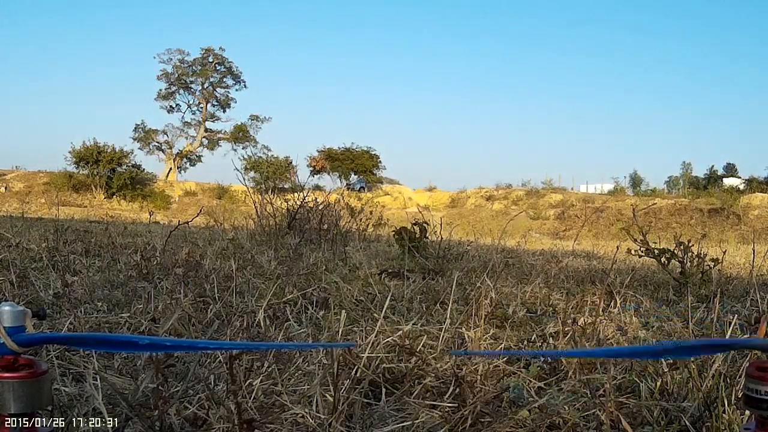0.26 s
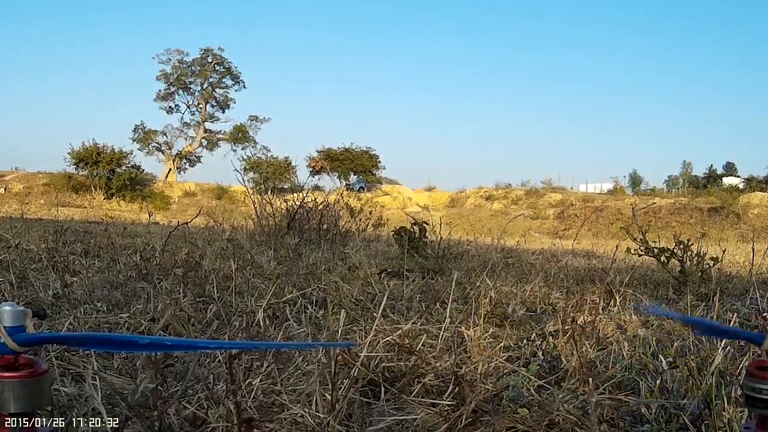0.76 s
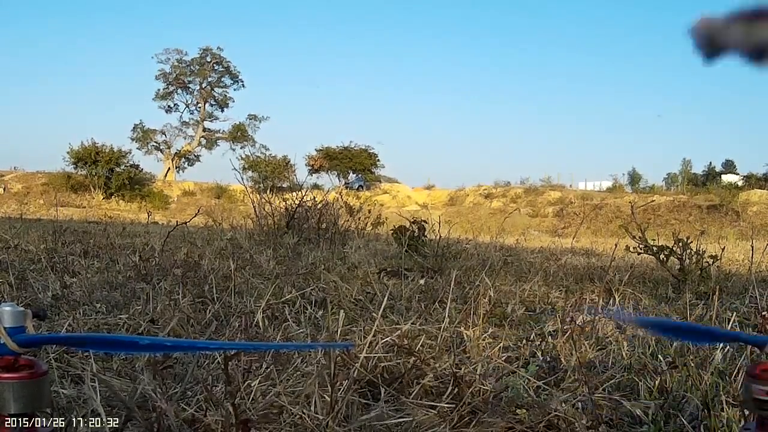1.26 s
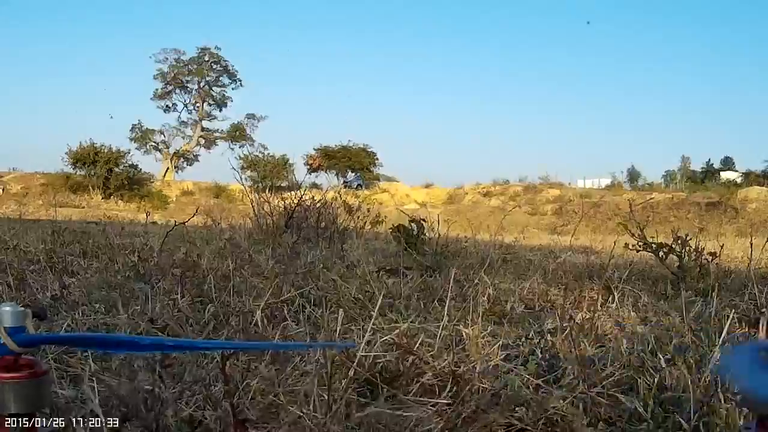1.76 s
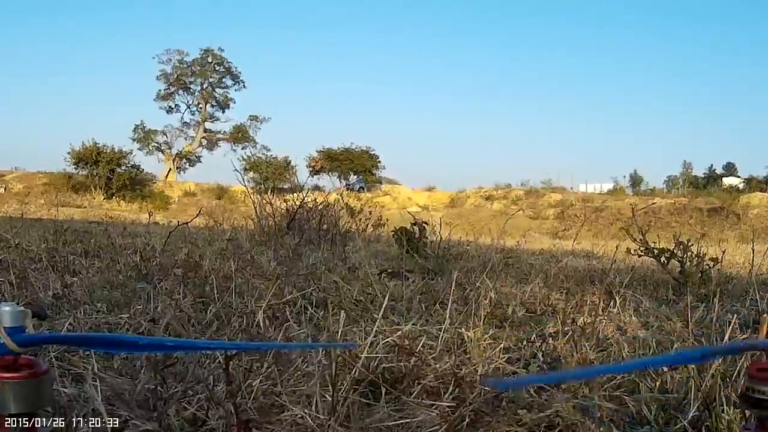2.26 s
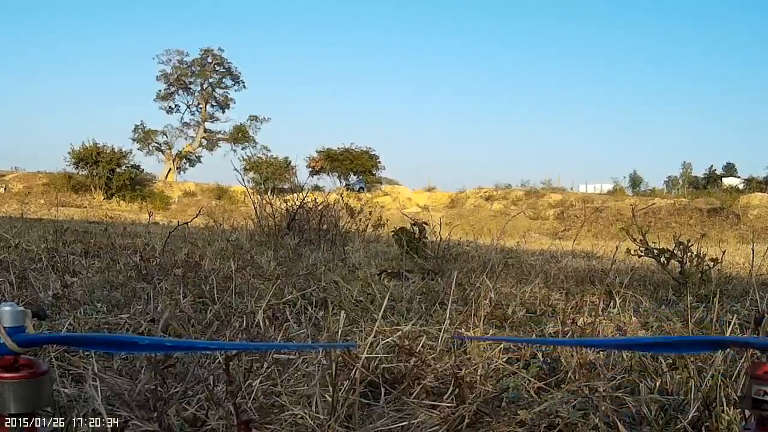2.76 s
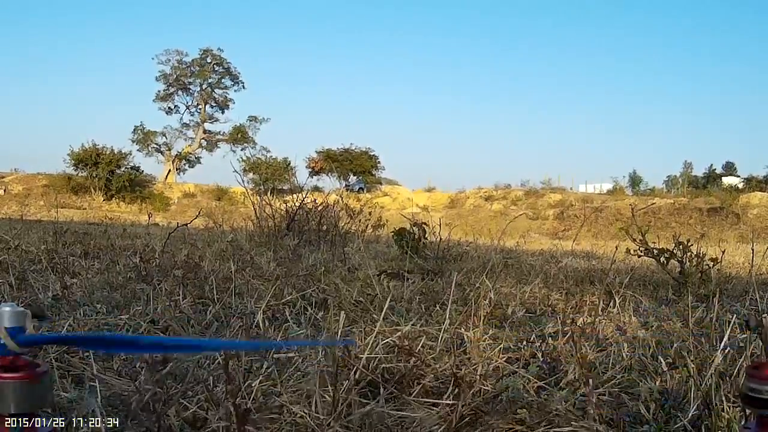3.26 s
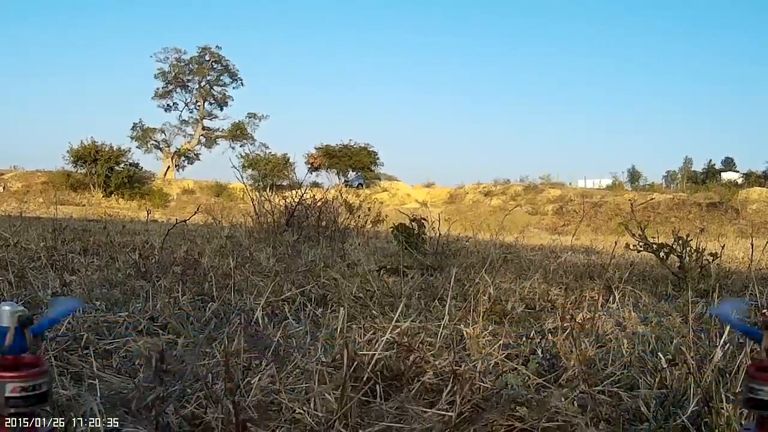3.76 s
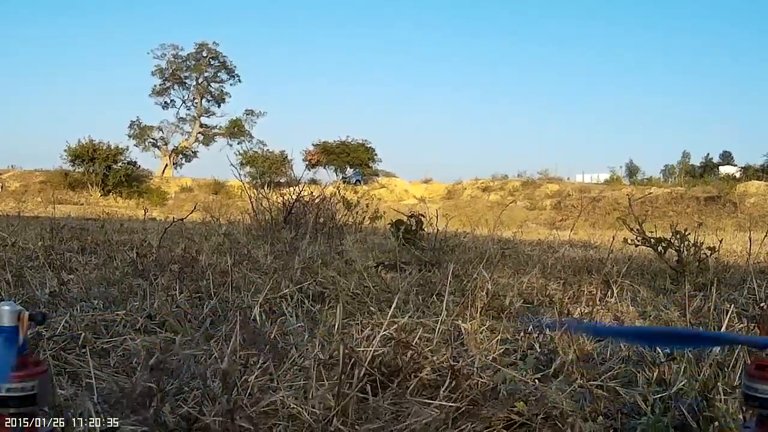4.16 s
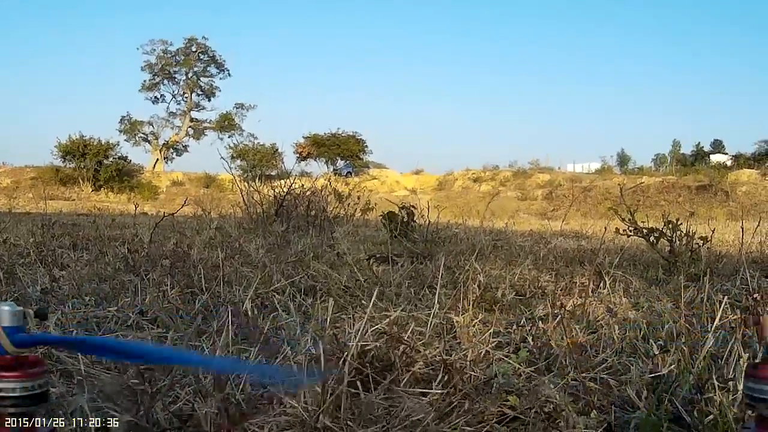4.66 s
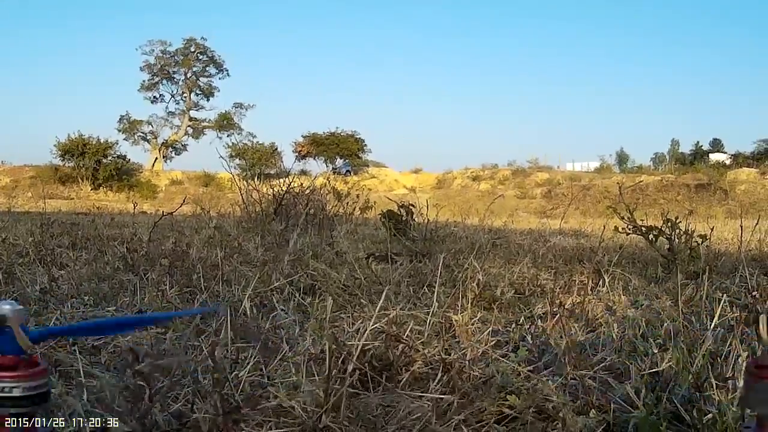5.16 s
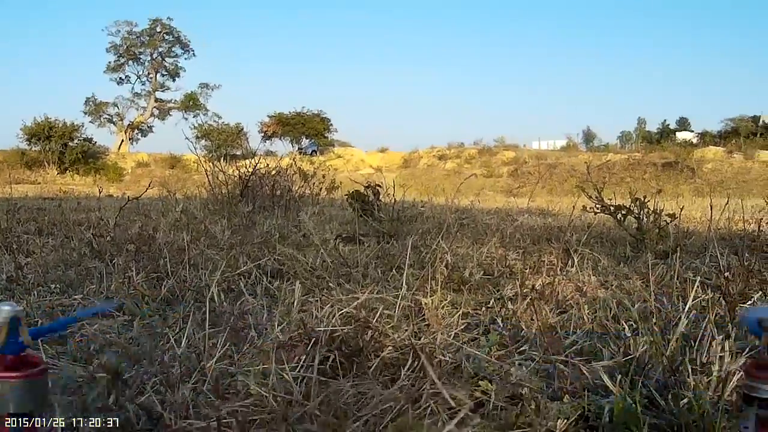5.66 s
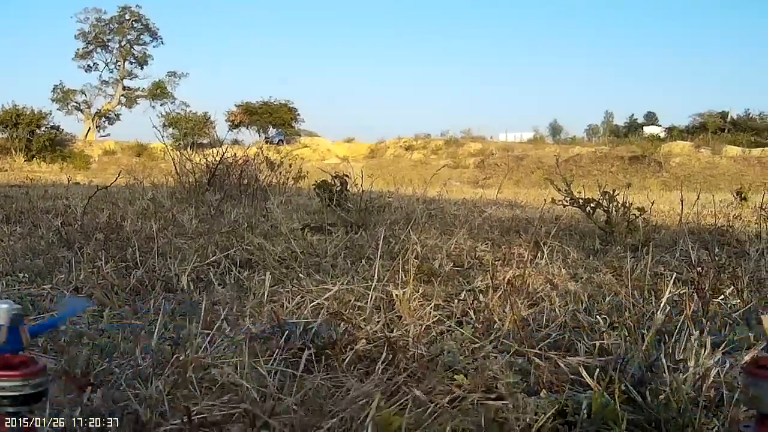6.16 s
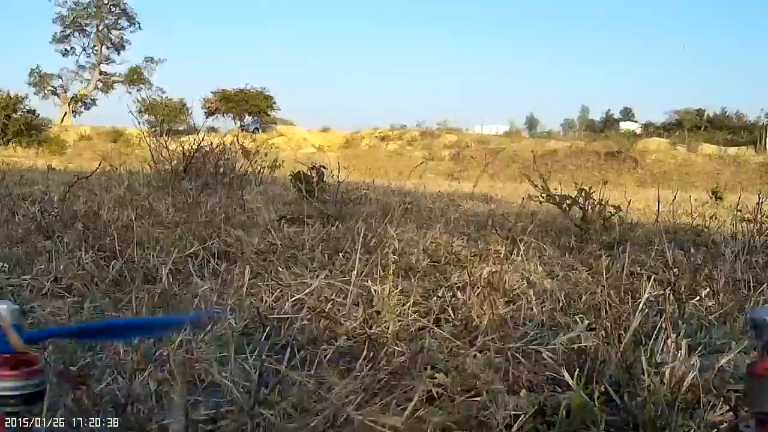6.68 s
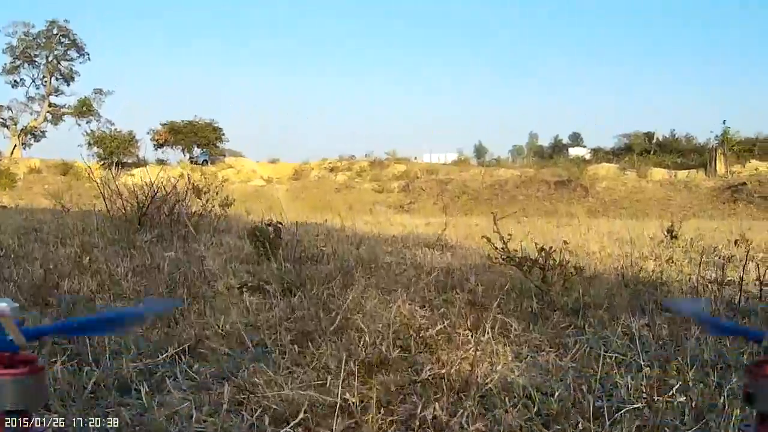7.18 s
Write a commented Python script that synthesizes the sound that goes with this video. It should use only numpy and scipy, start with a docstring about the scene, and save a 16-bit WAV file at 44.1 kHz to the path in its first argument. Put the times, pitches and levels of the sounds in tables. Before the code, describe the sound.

A small drone's motors spin up with a piercing whine and rasp, stop briefly, then restart and build with humming propellers and rumbling wind.

```python
"""A multicopter taking off from dry grass

Heard from its own frame, the motors spin up, stop, restart and lift off. Their speed controllers
switch the current on and off, making whines near 8 kHz that beat against each other. Bearings and
switching coils rasp through the frame, the propellers hum and swish, and their wind hits the microphone."""
import sys
import numpy as np
from scipy import signal
from scipy.fft import rfft, irfft, next_fast_len
from scipy.io import wavfile

SR = 44100
rng = np.random.default_rng(int(sys.argv[2]) if len(sys.argv) > 2 else 0)


def store_wav(level_fs):
    """Save 16-bit WAV to argv[1]."""
    pcm = np.round(np.clip(np.atleast_2d(level_fs), -1, 1) * 32767)
    wavfile.write(sys.argv[1], SR, pcm.T.astype(np.int16))


N = 327222
TIME = np.arange(N) / SR


# The pitch of each switching tone, in Hz.
SWITCH_HZ = [8011.8, 7995.3, 8016.8, 7990.4]
# How loud those tones are. Each row: dB in the first run, dB in the second, slow wander in dB.
SWITCH_LEVELS = [(-2, -2, 0.5), (-25, -14, 2), (-11, -9, 4), (-5, -7, 1.2)]
# Side tones made as a rotor chops the whine.
# Each row: motor, centre pitch in Hz, shift in cycles per turn, level in dB before fading.
SIDE_TONES = [(0, 8012, -14, -15), (0, 8012, 14, -24), (1, 7995, -24, -17), (1, 7995, -56, -16),
              (2, 8017, -14, -22), (2, 8017, 14, -28), (3, 8012, -14, -24), (4, 8012, 14, -27),
              (4, 8012, 42, -23), (0, 8012, -42, -15), (0, 16024, -14, -32)]
def whine(turns, halo_db=-28, halo_hz=110, fade_db_per_hz=.006, wander_hz=1.2):
    """Close switching tones beat; the spinning adds side tones that fade as they glide away."""
    restarted = TIME >= RUNS[1][0]
    tones = np.zeros(N)
    for hz, (first_db, second_db, wander_db) in zip(SWITCH_HZ, SWITCH_LEVELS):
        level = amp(np.where(restarted, second_db, first_db))
        wander = unit(amp(wander_db * drift(wander_hz)))
        tones += level * wander * tone(hz * TIME, flutter_db=.5, flutter_hz=30)
    angle = 2 * np.pi * SWITCH_HZ[0] * TIME
    halo = drift(halo_hz) * np.cos(angle) + drift(halo_hz) * np.sin(angle)  # hiss from jittery switching
    load = np.minimum(unit(rasp_level()), 1)
    sides = np.zeros(N)
    for motor, hz, per_turn, db in SIDE_TONES:
        shift_hz = abs(per_turn) * speed(motor)
        strength = amp(db - fade_db_per_hz * shift_hz) * load ** (abs(per_turn) / 42)  # far ones need load
        sides += strength * tone(hz * TIME + per_turn * turns[motor], flutter_db=3.5, flutter_hz=24)
    return current() * (tones + amp(halo_db) * halo + sides)


# The ring of the frame, and its high fizz. Each row: frequency in Hz, relative level in dB.
FRAME_RING = [(300, -36), (1400, -3.5), (2100, -18), (2700, -7.5), (3150, -9.5), (3600, -1), (3950, -2),
              (4350, -0.5), (4600, 3.5), (4800, -3.5), (5000, 4), (5350, -6), (6500, -2.5), (6900, -9.5),
              (7400, -3.5), (8300, -3), (9200, -16), (11000, -37)]
FIZZ_COLOUR = [(4000, -22), (7000, -6), (9000, -0.5), (10500, -1), (11250, -10), (12200, -0.5),
               (13100, -13), (15600, -9.5)]
def frame_rasp(turns, rasp_db=-1, grit_db=-3, fizz_db=-2, stumble_db=4):
    """Coil clicks and bearing grit ring the frame, pulsing as the rotors turn."""
    clicks = unit(sum(coil_clicks(turn) for turn in turns))
    pulsing = blade_pulse(turns, depth=0.15)
    grit = amp(grit_db) * noise()
    stumbling = amp(stumble_db * drift(130) * (1 - with_speed(knee=10, power=3)))  # slow rotors catch
    rasp = colour((clicks + grit) * pulsing * stumbling, FRAME_RING)
    fizz = colour(noise() * pulsing * amp(2 * drift(150) + 1.5 * drift(8)), FIZZ_COLOUR)
    return amp(rasp_db) * rasp_level() * rasp + amp(fizz_db) * fizz_level() * fizz


def coil_clicks(turn, per_turn=84, uneven=0.82):
    """A motor's coils click as they switch on and off, in a pattern that roughly repeats every turn."""
    step = np.floor(turn * per_turn).astype(int)
    at = np.flatnonzero(np.diff(step) > 0)
    turns_per_sample = turn[at + 1] - turn[at]
    overshoot = turn[at + 1] - step[at + 1] / per_turn
    early = np.clip(overshoot / turns_per_sample, 0, 1)  # shares a click between two samples
    pattern = rng.standard_normal(per_turn)[step[at] % per_turn]
    size = (pattern + uneven * rng.standard_normal(len(at))) / np.sqrt(turns_per_sample + 2 / SR)
    return unit(np.bincount(np.r_[at, at + 1], np.r_[size * early, size * (1 - early)], N))


def rasp_level(driven_db=-7.5, bearings_db=-27, airborne_db=-2):
    """The rasp grows with the current in the coils and with the speed of the bearings."""
    steady = np.hypot(amp(driven_db) * drive(), amp(bearings_db) * with_speed(knee=44, power=1.5))
    return steady * amp(buzz_db() + airborne_db * lifted())


def fizz_level(driven_db=-22, spinning_db=-36.5, airborne_db=-5):
    """The fizz sets in once the rotors turn, and thins after lift-off."""
    driven = amp(driven_db) * drive() * with_speed(knee=3.3, power=3)
    spinning = amp(spinning_db) * with_speed(knee=34, power=4.7)
    return np.hypot(driven, spinning) * amp(buzz_db() + airborne_db * lifted())


# Spells of buzzing. Each row: start in seconds, length in seconds, boost in dB.
BUZZES = [(1.604, 0.087, 0), (3.777, 0.71, 1.5), (3.86, 0.13, 2.5), (5.62, 0.29, 2.5), (6.263, 0.39, 2)]
def buzz_db(edge_s=0.015):
    """The extra level while the frame buzzes harder."""
    return sum(db * np.clip(np.minimum(TIME - start, start + length - TIME) / edge_s + .5, 0, 1)
               for start, length, db in BUZZES)


# The rumble of wind on the microphone. Each row: frequency in Hz, relative level in dB.
WIND_COLOUR = [(10, -39), (25, -4.5), (60, -3.5), (110, -4.5), (170, -7), (250, -10.5), (330, -15),
               (480, -16), (700, -22), (1500, -52)]
# Gusts. Each row: peak time in seconds, half width in seconds, boost in dB.
GUSTS = [(3.68, 0.19, 5.5), (4.06, 0.054, 4), (6.67, 0.096, 5.5), (7.03, 0.31, 4.5)]
def downdraught(lumps_db=2.5, lumps_hz=14, wind_db=5.5):
    """Lumpy wind from the propellers hits the microphone, lagging behind their speed."""
    level = amp(wind_db + run_db(column=2) + swells_db(GUSTS))
    build_up = with_speed(knee=45, power=4.6, lag_s=0.093)
    return level * build_up * colour(noise() * amp(lumps_db * drift(lumps_hz)), WIND_COLOUR)


# The hum of the blades. Each row: motor, cycles per turn, relative level in dB.
BLADE_TONES = [(0, 2, -5), (1, 2, -12), (2, 2, -16), (3, 2, -18), (4, 2, -5), (4, 4, -12), (0, 4, -17),
               (4, 6, -14), (0, 6, -23)]
# Their swish. Each row: frequency in Hz, relative level in dB.
SWISH_COLOUR = [(100, -18), (300, -8.5), (500, -5), (700, -2.5), (850, 0), (1050, 0), (1450, 0),
                (1700, -4.5), (2000, -11.5), (2600, -13.5), (4000, -12.5), (9000, -47)]
def propellers(turns, swish_db=-22, airborne_db=-2):
    """Two blades a turn make low tones, and churned air that swells as each blade passes."""
    hum = sum(amp(db) * tone(per_turn * turns[motor], flutter_db=2.5, flutter_hz=7)
              for motor, per_turn, db in BLADE_TONES)
    swish = colour(noise() * blade_pulse(turns, depth=0.17), SWISH_COLOUR)
    hum_level = amp(run_db(column=3)) * with_speed(knee=53.4, power=4.6)
    swish_level = amp(swish_db + airborne_db * lifted()) * with_speed(knee=32.7, power=6.3)
    return hum_level * hum + swish_level * swish


# The ring of a motor's bell, its spinning metal shell. Each row: frequency in Hz, relative level in dB.
BELL_RING = [(2500, -23.5), (3900, -12), (4200, -1), (4500, 1.5), (4680, 4), (4850, -14), (6000, -40)]
# Moments when the bells ring out. Each row: peak time in seconds, half width in seconds, boost in dB.
BELL_SWELLS = [(0.5, 0.067, 2.5), (0.71, 0.044, 6), (3.17, 0.06, 3.5), (3.5, 0.093, 5.5), (5.15, 0.15, 8.5),
               (7.33, 0.092, 9.5)]
def motor_bells(turns, bell_db=-9):
    """The heavy current of spin-up makes each coil click ring the motor shells, in uneven swells."""
    load = drive()
    clicks = sum(coil_clicks(turn) for turn in turns)
    level = amp(bell_db + swells_db(BELL_SWELLS)) * load ** 2 / load.max()
    return level * with_speed(knee=3.9, power=2.4) * colour(clicks, BELL_RING)


# The tug of the magnets. Each row: motor, tugs per turn, relative level in dB.
MAGNET_TUGS = [(0, 14, -9.5), (1, 14, -4.5), (4, 14, 0), (0, 13, 2), (1, 15, 0.5), (2, 14, 6)]
# The ring of the bending arms. Each row: frequency in Hz, relative level in dB.
ARM_RING = [(200, -24), (600, -25), (760, -13.5), (830, 0), (890, 0), (970, -7), (1150, -13), (1480, -15.5),
            (1900, -28.5), (4000, -43.5)]
# Swells and a dip in that ring. Each row: middle in seconds, half width in seconds, change in dB.
ARM_SWELLS = [(1.28, 0.17, 3.5), (1.8, 0.074, -1.5), (4.38, 0.13, 2)]
def arms(turns, arm_db=-27, light_db=-4.5, shudder_db=-33, crossing_db=-31, crossing_speed=17):
    """The arms sing when the magnets tug at their natural pitch; at low speed the coils shake them."""
    pull = sum(amp(db) * tone(per_turn * turns[motor], flutter_db=1.5, flutter_hz=16)
               for motor, per_turn, db in MAGNET_TUGS)
    ring = colour(pull * with_speed(knee=25, power=4.3), ARM_RING)
    lightness = ramp(start_s=4.25, length_s=2.3)  # the arms ring less as the legs carry less weight
    ring_level = amp(arm_db + swells_db(ARM_SWELLS) + light_db * lightness)
    octaves_away = np.log2(throttle() / crossing_speed + 1e-6)
    crossing = np.exp(-(octaves_away / 0.61) ** 2)
    shudder = amp(shudder_db) * with_speed(knee=15, power=1) + amp(crossing_db) * crossing
    return ring_level * ring + shudder * colour(noise(), ARM_RING)


# Tones of the switching coils. Each row: motor, base pitch in Hz or 0, added cycles per turn, level in dB.
COIL_TONES = [(1, 7995, -56, 4), (0, 0, 84, -6), (1, 0, 84, -5), (2, 0, 84, -2), (3, 0, 84, -4),
              (4, 0, 84, 1), (4, 0, 42, -1), (0, 0, 42, -3), (0, 0, 70, -3), (4, 0, 70, -5)]
# What the motor mounts let through. Each row: frequency in Hz, relative level in dB.
MOUNT_RING = [(300, -35), (700, -20), (880, -2), (1100, -8), (1500, -5), (2100, -10), (2700, -8),
              (3600, -6), (3950, -10), (4300, 0), (4600, 6), (4800, -4), (5050, -2), (5400, -15),
              (5850, -4), (6200, -17), (7500, -22)]
def coil_singing(turns, singing_db=-32, wobble_cycles=0.048, full_load_db=-21):
    """Under load, coil tones glide with each shaft and flare at the pitches where the mounts ring."""
    tones = np.zeros(N)
    load = np.tanh(current() / amp(full_load_db))
    for motor, hz, per_turn, db in COIL_TONES:
        # a side tone of the whine needs more speed to be heard
        spinning = np.tanh(speed(motor) / 55) ** 4 if hz else np.tanh(speed(motor) / 28) ** 2
        cycles = hz * TIME + per_turn * turns[motor] + wobble_cycles * drift(60)
        tones += amp(db) * spinning * tone(cycles, flutter_db=4, flutter_hz=14)
    return amp(singing_db) * colour(tones * load, MOUNT_RING)


# Sharp ticks. Each row: start in seconds, relative level in dB, share of dull knock from 0 to 1.
TICKS = [(0.0418, -30, .2), (0.0488, -25, 0), (0.0665, -29, 0.3), (0.0695, -22, .2), (0.1005, -22, .15),
         (0.12, -17, 0.1), (2.0353, -4.5, 0.53), (2.433, -29, .2), (2.5605, -34.5, 0), (2.5825, -38, 0.2),
         (2.6215, -21.5, 0.2), (2.7216, -10.5, 0), (5.825, -13, .02)]
# The dull knock. Each row: frequency in Hz, relative level in dB.
KNOCK_COLOUR = [(200, -39), (1000, -2), (1400, 15), (1850, 10), (2400, -10), (3100, -15), (3700, 10),
                (4400, -18), (7000, -21), (10000, -32)]
def rotor_ticks(tick_db=-5.5, decay_s=0.0047):
    """Rotors brake, twitch and catch, sending short scrapes into the frame."""
    chatter = [(2.1035 + k * 0.0131, -10 + k * 0.67, 0.7) for k in range(8)]  # growing knocks of braking
    bright, dull = np.zeros((2, N))
    burst = np.exp(-TIME[:SR // 20] / decay_s)
    for start, db, knock in TICKS + chatter:
        for bursts, share in ((bright, 1 - knock), (dull, knock)):
            bursts[round(start * SR):][:len(burst)] += amp(db + tick_db) * share * burst
    return sum(np.std(bursts) * colour(noise() * bursts, body)
               for bursts, body in ((bright, FRAME_RING), (dull, KNOCK_COLOUR)))


# First pulses of current. Each row: start in seconds, level in dB.
START_PULSES = [(0.0427, -23), (0.0485, -30), (2.609, -20)]
def start_chirps(rise_s=0.001, decay_s=0.0024):
    """The resting coils chirp at the switching pitch as the current first takes hold."""
    chirps = np.zeros(N)
    for start, db in START_PULSES:
        age = np.maximum(TIME - start, 0)
        envelope = np.tanh(age / rise_s) ** 2 * np.exp(-age / decay_s)
        chirps += amp(db) * envelope * np.sin(2 * np.pi * SWITCH_HZ[0] * age)
    return chirps


def grass_crackle(crackle_db=-7, spread_db=4.6, decay_s=.0006):
    """Dry grass and grit, stirred by the propellers' wind, patter on the craft."""
    sizes = amp(spread_db * np.minimum(rng.exponential(1, N), 3))
    hits_per_s = 150 * throttle() / 60
    hits = sizes * (rng.random(N) < hits_per_s / SR)
    grains = signal.lfilter([1], [1, -np.exp(-1 / (decay_s * SR))], hits) * noise()
    return amp(crackle_db) * fizz_level() * colour(grains, FIZZ_COLOUR)


# The throb of the rocking frame. Each row: frequency in Hz, relative level in dB.
ROCKING_COLOUR = [(15, -13), (35, -1), (65, 3), (110, -19), (300, -36), (1000, -55)]
def rocking(rocking_db=-42):
    """Turning rotors rock the frame on its legs: a soft, low throb."""
    return amp(rocking_db) * with_speed(knee=8.4, power=0.74) * colour(noise(), ROCKING_COLOUR)


# The background. Each row: frequency in Hz, relative level in dB.
FIELD_COLOUR = [(20, -31), (70, -10), (200, -6), (900, -19), (2000, -26), (8000, -34), (11000, -36)]
def open_field(field_db=-60):
    """A faint, steady rush lies under everything."""
    return amp(field_db) * colour(noise(), FIELD_COLOUR)


# The speed asked for in each run. Each row: time in seconds, turns per second.
FIRST_SPIN = [(0.05, 0), (0.35, 23.4), (0.65, 44.5), (0.85, 52.6), (1.35, 59.8), (1.7, 67), (1.85, 62.5),
              (2.05, 43), (2.42, 15), (2.55, 0)]
SECOND_SPIN = [(2.62, 0), (2.75, 6), (3.1, 34.5), (3.3, 42.7), (3.9, 55.6), (4.3, 60.4), (4.65, 59.7),
               (5.35, 64.5), (5.75, 60.8), (7.42, 63)]
def throttle():
    """The set speed of the motors, in turns per second."""
    return curve(FIRST_SPIN + SECOND_SPIN, column=1)


# Steering. Each row: time in seconds, tilt, sideways lean (1 is a firm push).
STEERING = [(2.55, 0, 0.3), (2.8, -1, -0.6), (4.45, -1, -0.7), (5.0, -1, 0.3), (5.35, -1, 0.4),
            (5.75, -0.1, 0.4), (6.55, 0.2, 0.9), (7.42, 0.6, -0.6)]
# The five motors that stand out. Each row: share of the set speed, share added by tilt, by lean.
MOTORS = [(1, 0, 0), (0.945, 0, 0), (0.8, 0.11, 0), (0.78, 0.27, 0), (1.06, 0, 0.08)]
def speed(motor):
    """One motor's turns per second: its share of the set speed, shifted by the steering."""
    share, tilt, lean = MOTORS[motor]
    return throttle() * (share + tilt * curve(STEERING, column=1) + lean * curve(STEERING, column=2))


def shaft_turns(nudge=.0025, nudge_hz=10):
    """How many turns each shaft has made; the flight controller keeps nudging every speed."""
    return [np.cumsum(speed(k) * (1 + nudge * drift(nudge_hz))) / SR for k in range(len(MOTORS))]


# The two runs. Each row: power on in seconds, throttle cut in seconds, wind level in dB, hum level in dB.
RUNS = [(0.063, 1.672, -27.5, -18), (2.607, 7.42, -25, -17.5)]
COAST_S = 0.36
def drive(cruise_db=-21, soft_db=-20.5, soft_s=0.1, surge_db=10.5, settle_s=1.09):
    """The current that drives the motors, as a gain: soft start, surge, cruise, and a fade at the cut."""
    gain = np.zeros(N)
    for on, cut, *_ in RUNS:
        age = np.maximum(TIME - on, 0)
        db = cruise_db + soft_db * np.exp(-age / soft_s) + surge_db * np.exp(-age / settle_s)
        fade = (1 - ramp(cut, COAST_S)) ** 0.79
        gain += ramp(on, length_s=0.003) * amp(db) * fade
    return gain


def current(brake_db=-20, brake_s=0.41):
    """The driving current, plus a swell of braking current once the drive has faded."""
    braking = sum(np.sin(np.pi * ramp(cut + COAST_S, brake_s)) for _, cut, *_ in RUNS)
    return drive() + amp(brake_db) * braking


def run_db(column):
    """A level from RUNS that switches when the motors restart."""
    return np.where(TIME < RUNS[1][0], RUNS[0][column], RUNS[1][column])


def with_speed(knee, power, lag_s=0):
    """A gain that grows with speed and levels off above the knee, given in turns per second."""
    growth = (np.interp(TIME - lag_s, TIME, throttle()) / knee) ** power
    return growth / (1 + growth)


def blade_pulse(turns, depth):
    """A gain that swells twice a turn, as each blade passes."""
    return np.exp(depth * unit(sum(np.cos(2 * np.pi * 2 * turn) for turn in turns)))


def lifted():
    """0 on the grass, 1 in the air."""
    return ramp(start_s=6.8, length_s=0.31)


def ramp(start_s, length_s):
    """A straight rise from 0 to 1."""
    return np.clip((TIME - start_s) / length_s, 0, 1)


def swells_db(rows):
    """Smooth rises and falls in level, in dB."""
    return sum(db * np.exp(-((TIME - middle) / width) ** 2) for middle, width, db in rows)


def curve(rows, column):
    """One column of a table, joined by straight lines over time."""
    rows = np.array(rows)
    return np.interp(TIME, rows[:, 0], rows[:, column])


def tone(cycles, flutter_db, flutter_hz):
    """A pure tone that follows a running count of cycles and flutters in level."""
    sine = np.sqrt(2) * np.sin(2 * np.pi * (cycles + rng.random()))
    return sine * unit(amp(flutter_db * drift(flutter_hz)))


def colour(x, points):
    """Filters a sound through (Hz, dB) points, then scales it to an average level of 1."""
    size = next_fast_len(N + SR // 2)
    hz, db = np.transpose(points)
    log_hz = np.log(abs(np.fft.fftfreq(size, 1 / SR)) + 1)
    log_gain = np.log(amp(np.interp(log_hz, np.log(hz), db)))
    response = np.exp(np.conj(signal.hilbert(log_gain)))[:size // 2 + 1]  # rings only after a hit
    return unit(irfft(rfft(x, size) * response, size)[:N])


def drift(hz):
    """A smooth random wobble, no faster than about hz."""
    return unit(irfft(rfft(noise()) / (1 + (np.fft.rfftfreq(N, 1 / SR) / hz) ** 4), N))


def noise():
    """White noise: an even hiss."""
    return rng.standard_normal(N)


def amp(db):
    """Turns decibels into a gain."""
    return 10 ** (np.asarray(db) / 20)


def unit(x):
    """Scales to an average (rms) level of 1."""
    return x / np.sqrt(np.mean(x ** 2) + 1e-20)


def scene():
    """The whole craft sits within an arm's length of the microphone, in an open field."""
    turns = shaft_turns()
    motors = whine(turns) + frame_rasp(turns) + coil_singing(turns) + motor_bells(turns)
    shaking = arms(turns) + rocking() + rotor_ticks() + start_chirps()
    air = propellers(turns) + downdraught() + grass_crackle()
    return (motors + shaking + air + open_field())[None]


def record(dry, top_hz=15750):
    """The camera on the frame rounds off the biggest peaks, then cuts the highest treble."""
    rounded = dry / (1 + dry ** 6) ** (1 / 6)
    lowpass = signal.firwin(511, top_hz, window=("kaiser", 9), fs=SR)
    return signal.oaconvolve(rounded, lowpass[None], "same")


dry = scene()
out = record(dry)
store_wav(out)
```